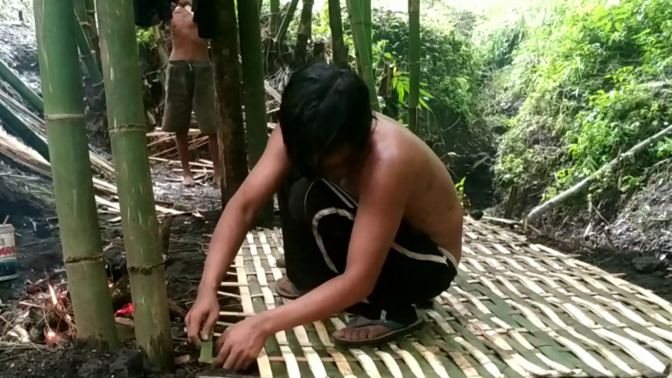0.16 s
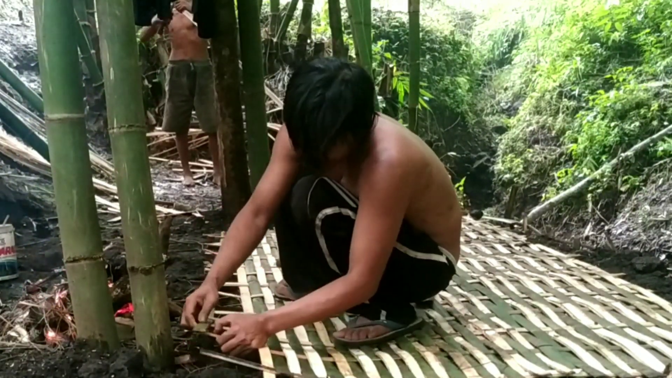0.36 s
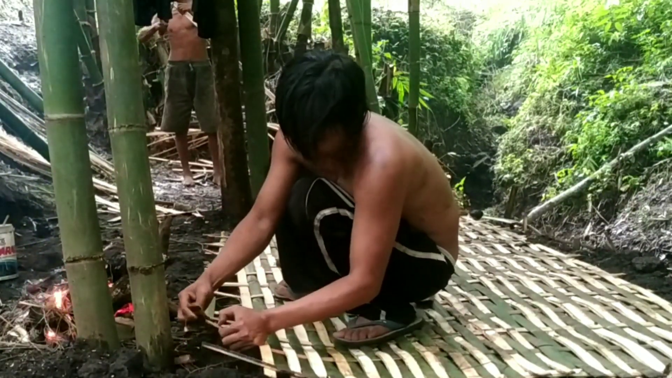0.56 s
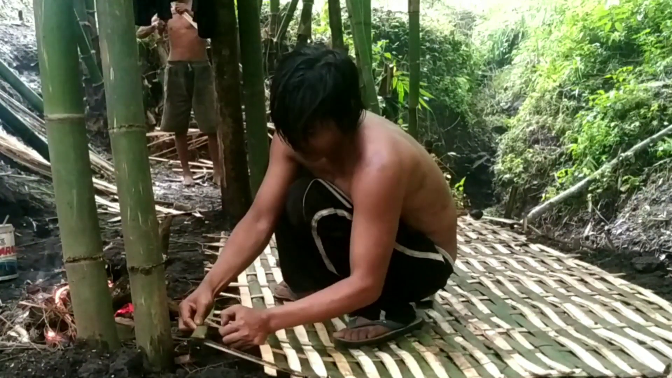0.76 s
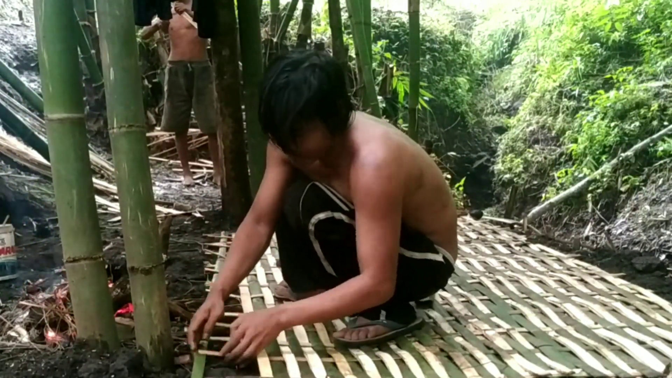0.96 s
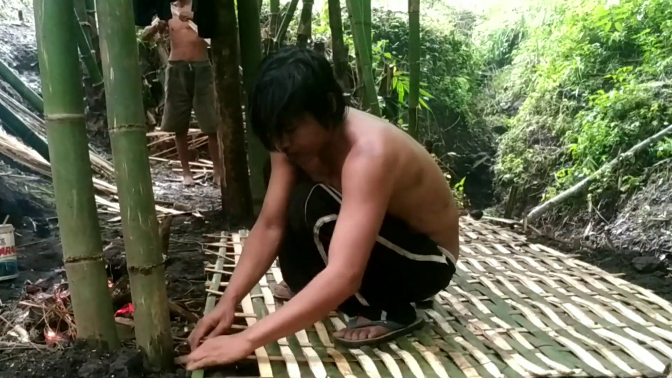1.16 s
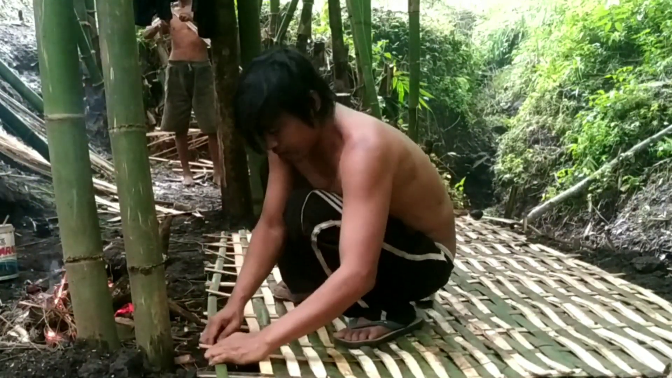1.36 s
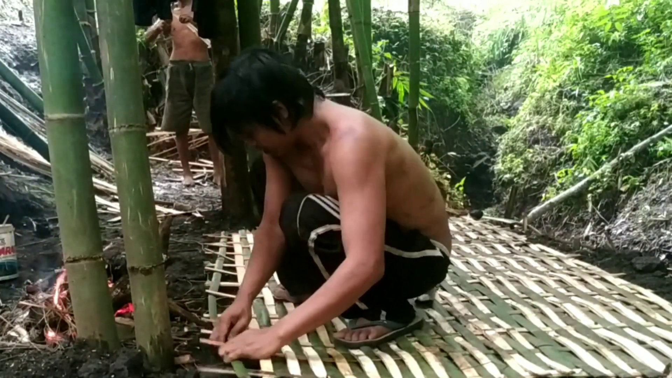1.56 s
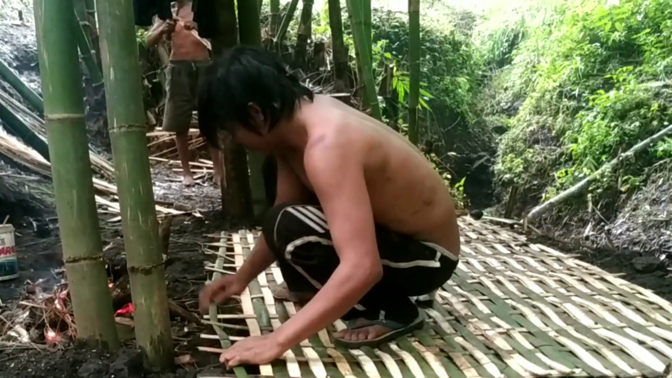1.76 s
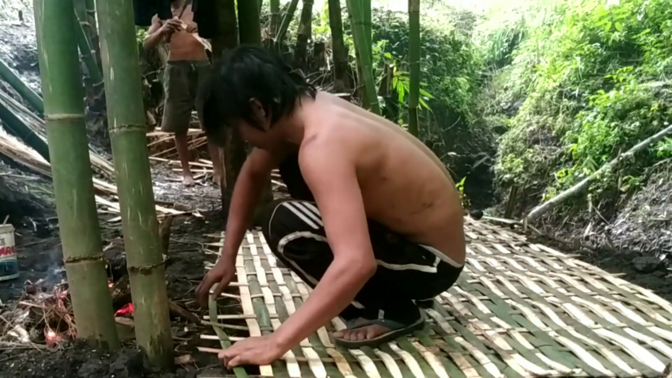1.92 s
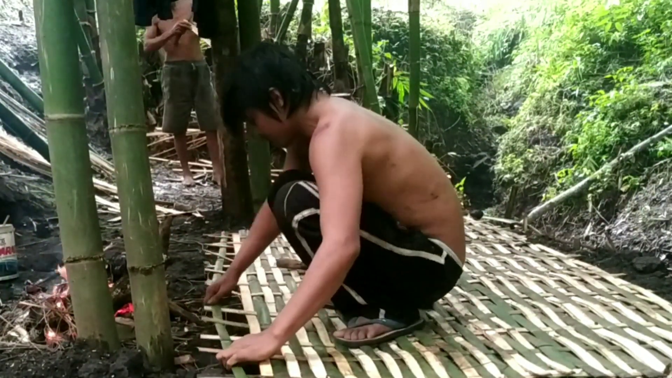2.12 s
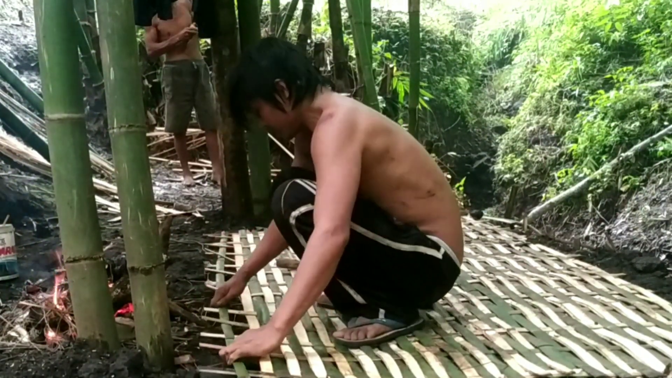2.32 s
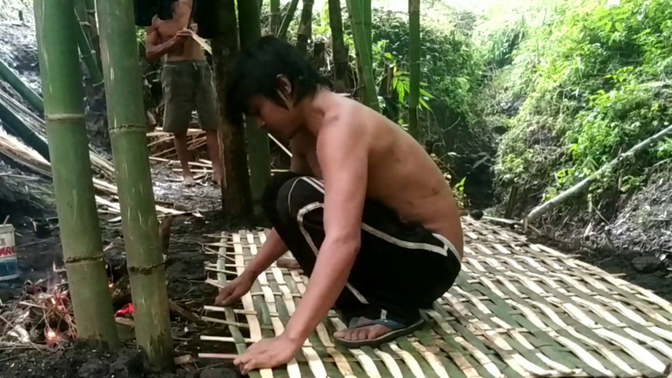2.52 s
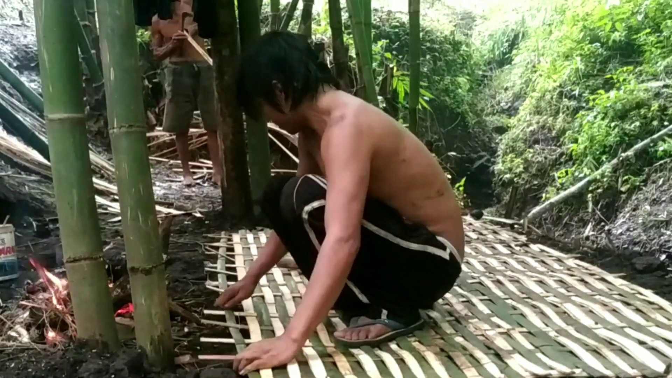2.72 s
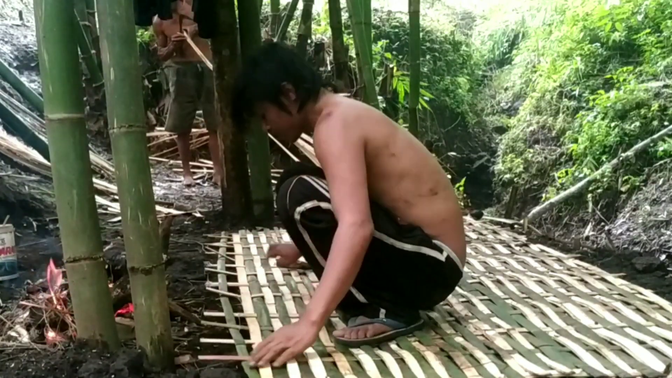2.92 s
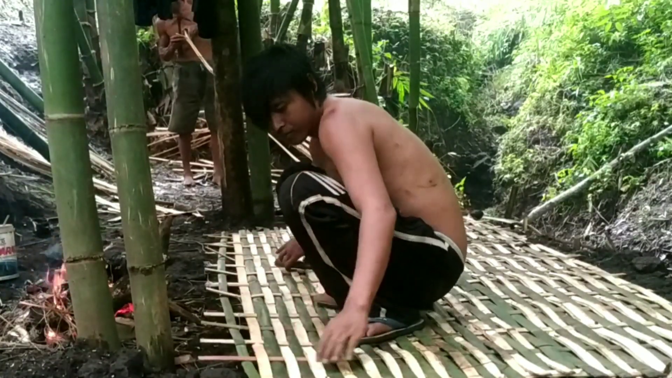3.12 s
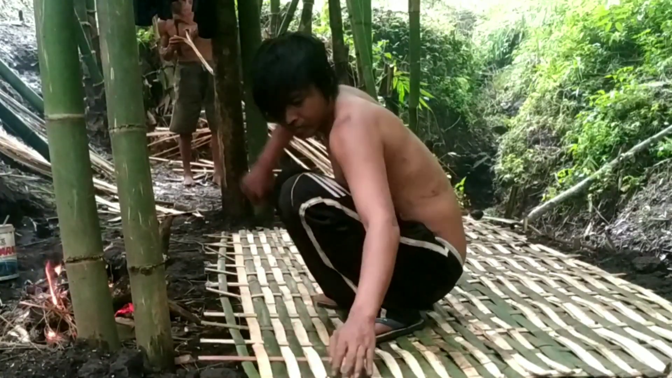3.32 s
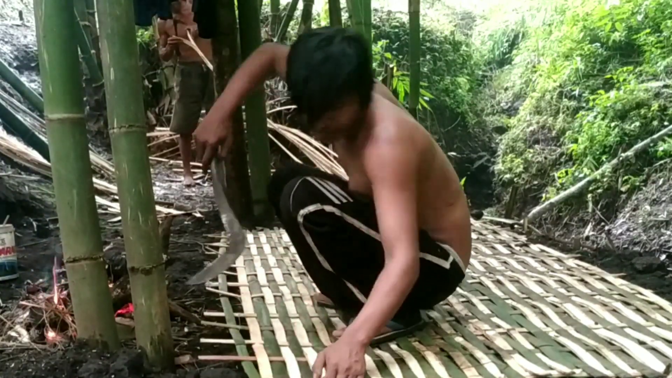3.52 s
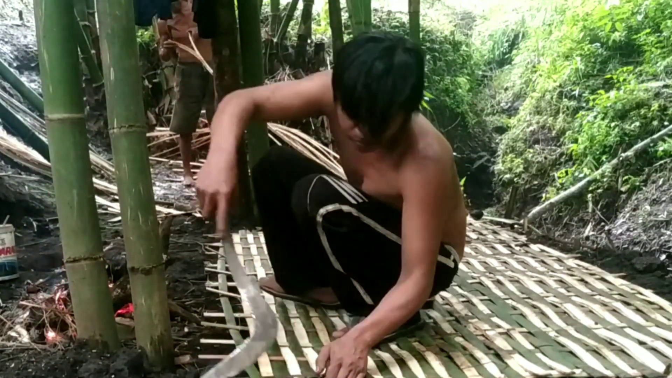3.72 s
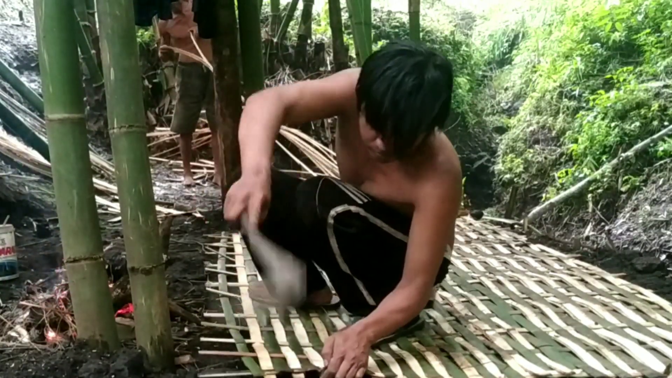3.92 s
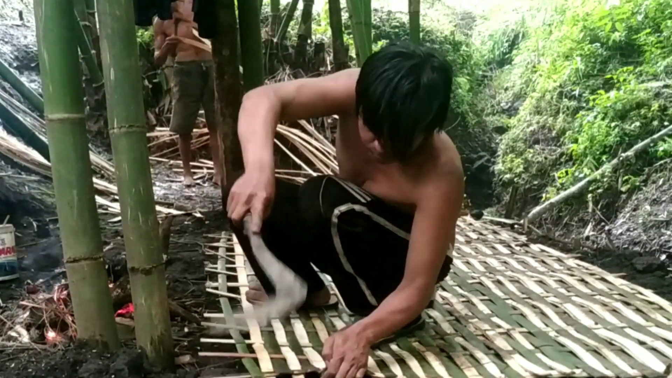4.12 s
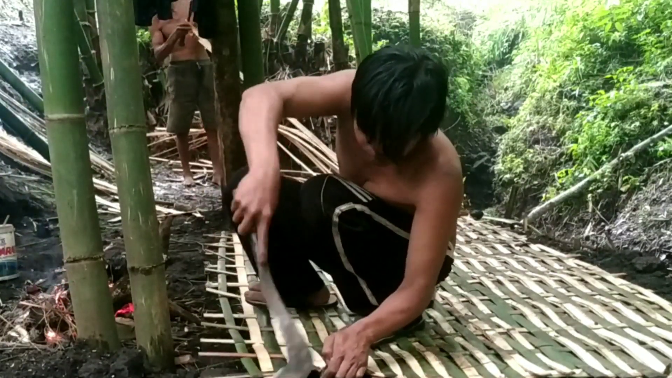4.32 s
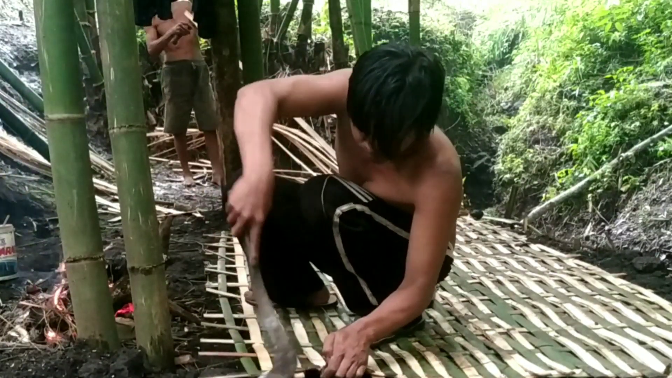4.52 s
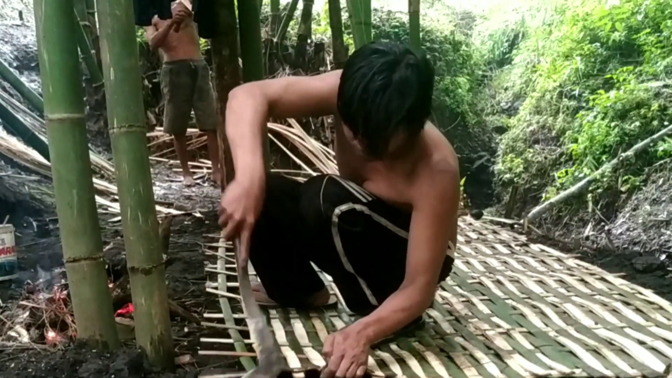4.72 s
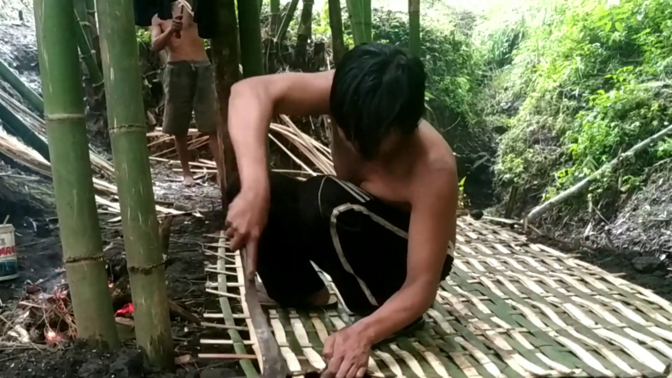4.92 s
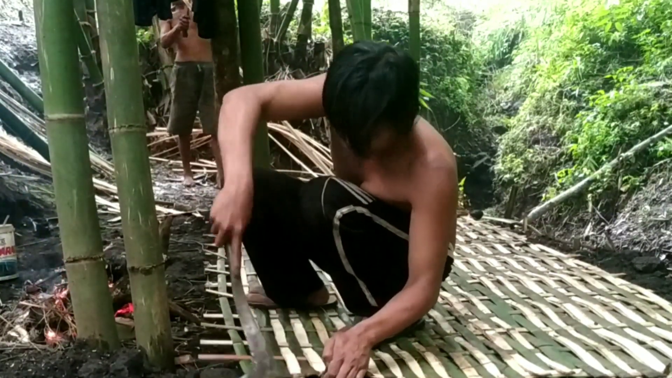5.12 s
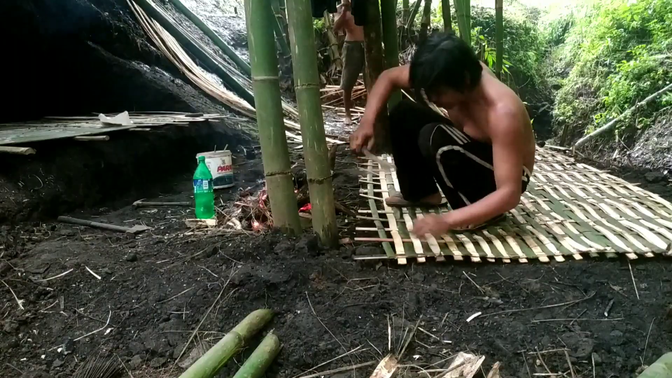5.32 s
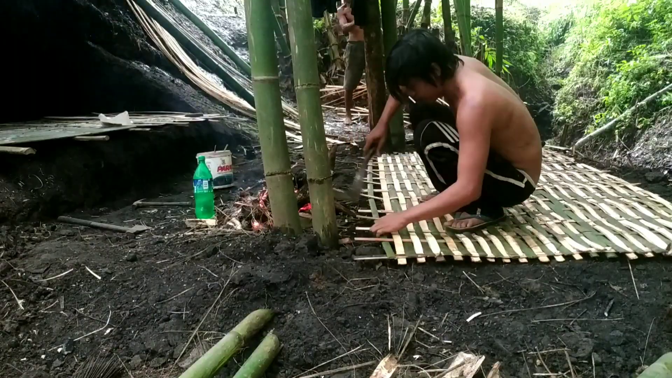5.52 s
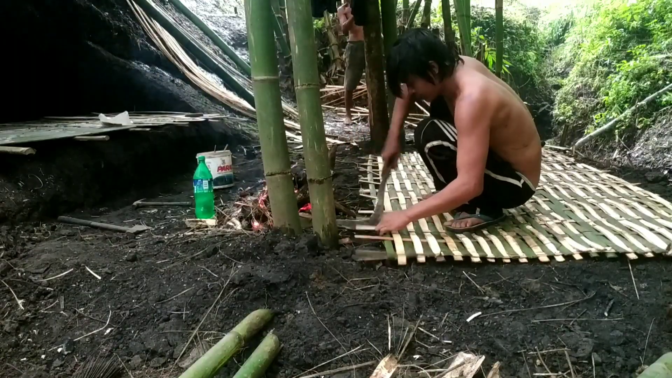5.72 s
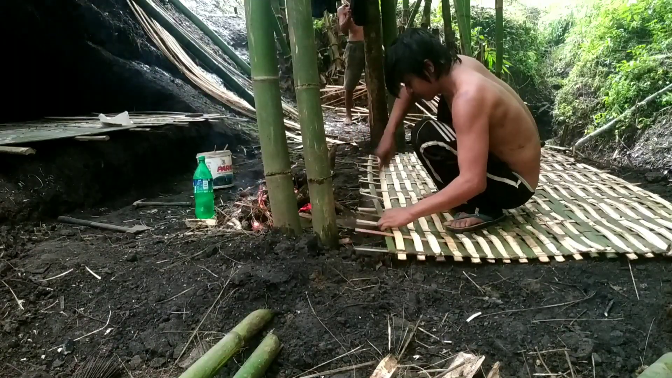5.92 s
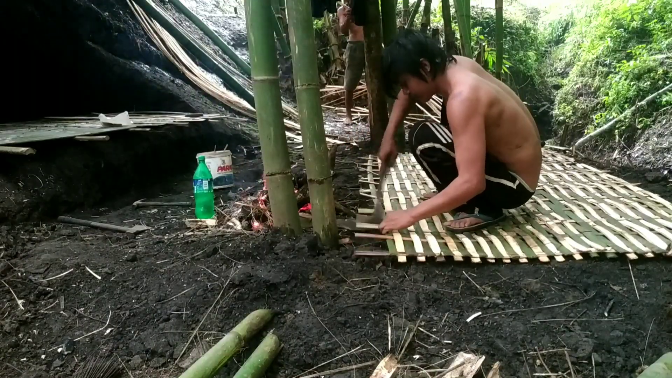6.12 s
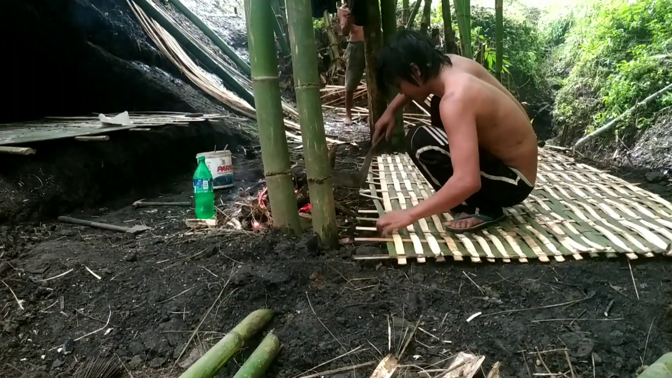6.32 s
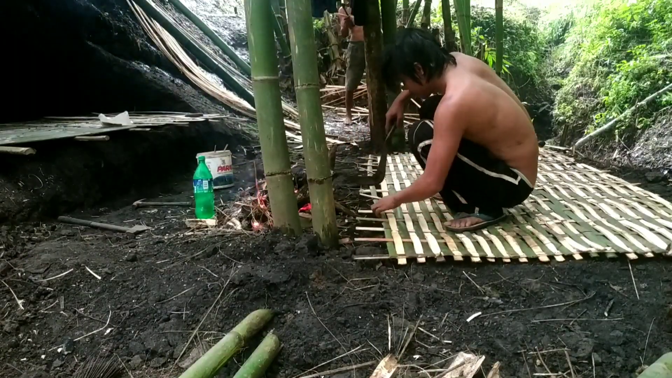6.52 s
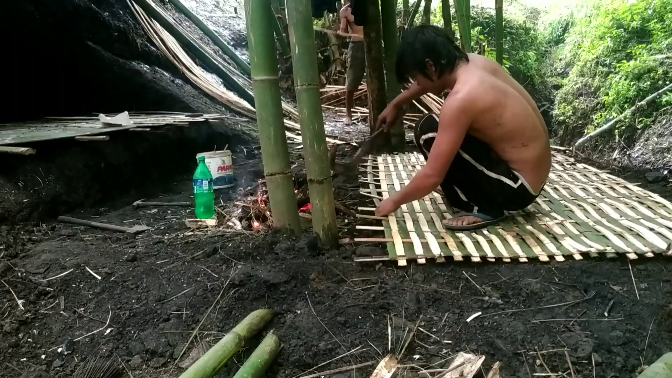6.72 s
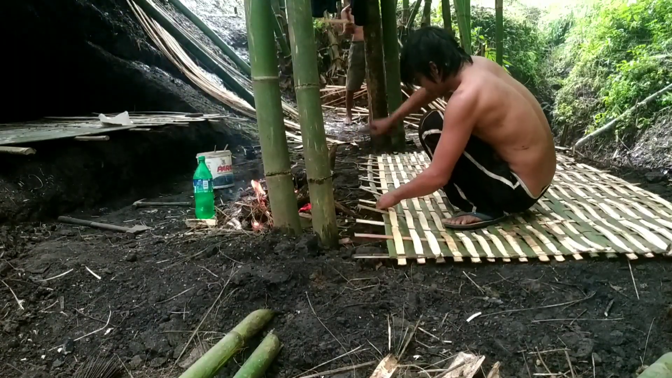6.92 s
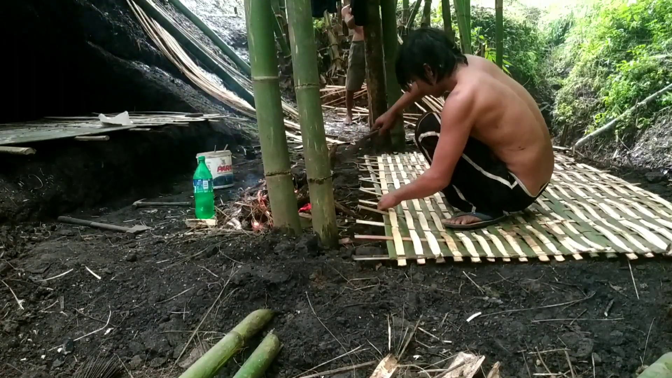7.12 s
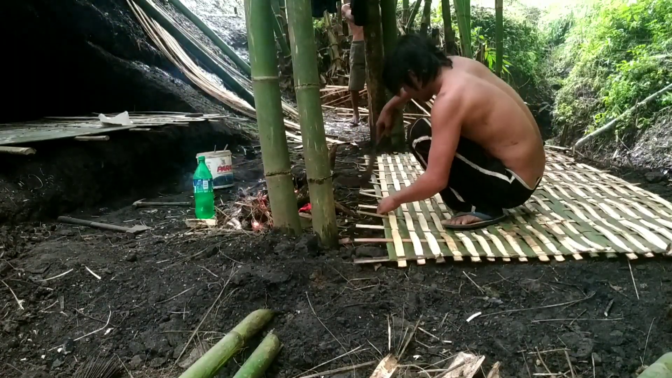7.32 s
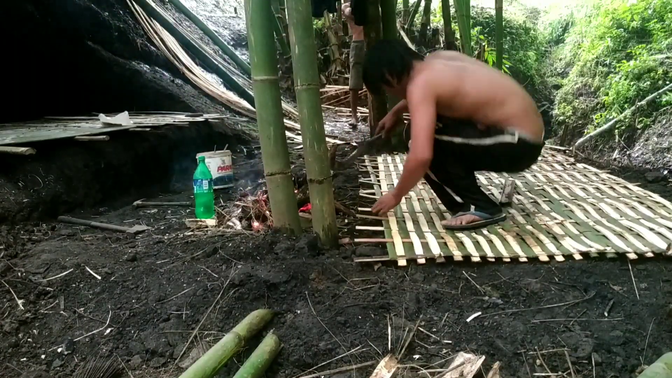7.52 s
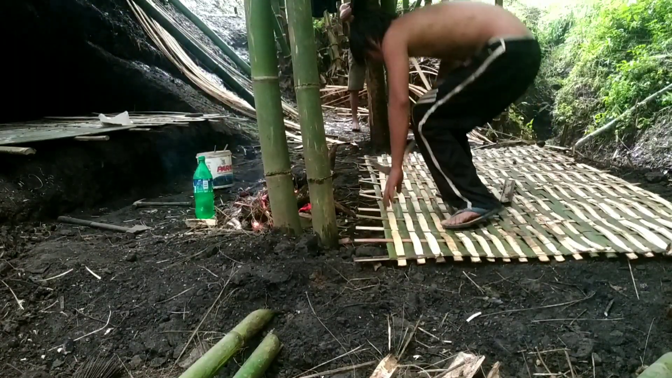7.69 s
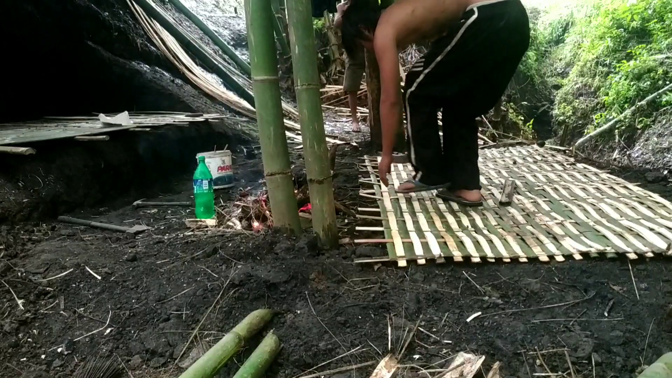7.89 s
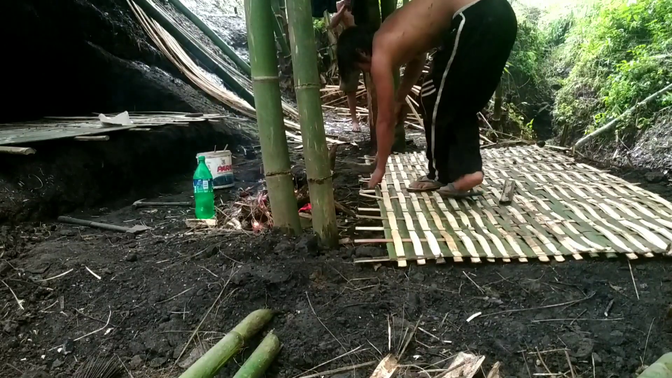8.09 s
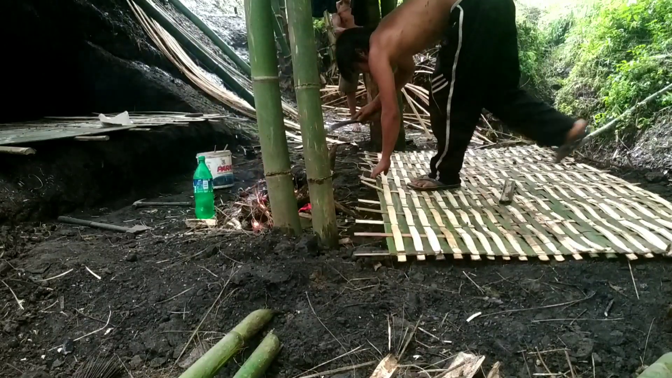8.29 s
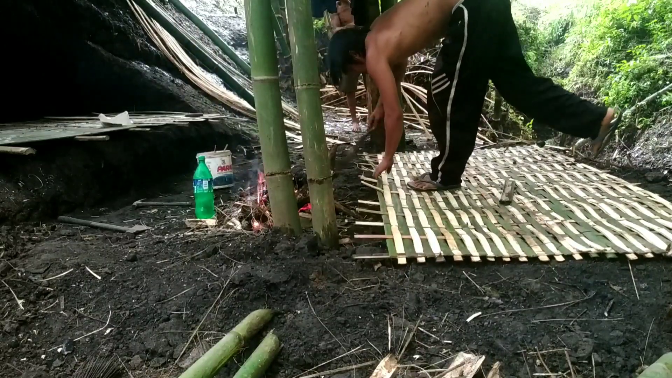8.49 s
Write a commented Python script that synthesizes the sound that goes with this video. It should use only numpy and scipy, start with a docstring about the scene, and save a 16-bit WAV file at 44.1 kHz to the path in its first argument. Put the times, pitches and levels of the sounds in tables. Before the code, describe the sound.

A blade knocks on split bamboo in sharp, rattling blows, with cicadas and crickets droning in the forest around.

```python
"""A weaver drives the strips of a split bamboo panel tight with the back of a blade, crouching on it.
Each blow makes the strips ring, clatter and rattle on; some blows ring the blade too.
Hands and feet scrape over the weave. In the forest around, cicadas and crickets drone and chirp,
louder on the right, over a low murmur of air and embers. Now and then an ember pops."""
import sys
import numpy as np
from scipy import signal
from scipy.fft import rfft, irfft
from scipy.io import wavfile
from scipy.ndimage import uniform_filter1d

SR = 44100
rng = np.random.default_rng(int(sys.argv[2]) if len(sys.argv) > 2 else 0)


def store_pcm(level_fs):
    """Save levels as 16-bit WAV."""
    pcm = np.round(np.clip(level_fs, -1, 1) * 32767).astype(np.int16)
    wavfile.write(sys.argv[1], SR, np.atleast_2d(pcm).T)


N = 377055
BLOW_SIZE, LEAD_S = 2 ** 14, 0.02  # samples in one blow; time before the blade lands
BLOW_T, BLOW_HZ = np.arange(BLOW_SIZE) / SR, np.fft.rfftfreq(BLOW_SIZE, 1 / SR) + 1


def undb(db):
    """Turn decibels into a gain."""
    return 10 ** (np.asarray(db) / 20)


def pan(db):
    """Left and right gains. Pan is left minus right in dB, so below zero is to the right."""
    return undb(np.array([[db / 2], [-db / 2]]))


def fade(t, fade_s):
    """A dying gain. A fade time is how long it takes to drop 60 dB."""
    return 1000 ** (-t / fade_s)


def shape(table, size):
    """Turn (frequency, level) rows into a filter that keeps the overall power of white noise."""
    hz, db = np.transpose(table)
    gain = undb(np.interp(np.log(np.fft.rfftfreq(size, 1 / SR) + 1), np.log(hz), db))
    return gain / np.sqrt(np.mean(gain ** 2))


def through(x, gain):
    """Filter a sound with one gain for each frequency."""
    return irfft(rfft(x) * gain, x.shape[-1])


def causal(gain):
    """The same filter, made to respond only after the sound arrives."""
    cepstrum = irfft(np.log(gain + 1e-6))
    cepstrum[1:len(gain) - 1] *= 2
    cepstrum[len(gain):] = 0
    return np.exp(rfft(cepstrum))


def wobble(rate, size=N):
    """Slide to a new random value, typically within -1 to 1, `rate` times a second."""
    step = int(SR / rate)
    return uniform_filter1d(np.repeat(rng.standard_normal(size // step + 1), step), step)[:size]


def swells(rows):
    """A gain that swells and sinks around each (time, level, rise, fall) row."""
    t, power = np.arange(0, N, 32) / SR, 0
    for s, db, rise, fall in rows:
        power = power + undb(2 * db) * np.exp(-((t - s) / np.where(t < s, rise, fall)) ** 2)
    return np.interp(np.arange(N) / SR, t, np.sqrt(power))


def set_loudest(x, db):
    """Scale a sound so its loudest 4 ms have this level."""
    return x * undb(db) / np.sqrt(uniform_filter1d(np.mean(x ** 2, axis=0), SR // 250).max())


def add(out, part, s):
    """Mix a part in at s seconds."""
    start = int(s * SR)
    out[:, start:start + part.shape[1]] += part[:, :N - start]


def grains(size, spread_db, alike_hz):
    """Noise of many tiny, uneven touches; left and right are alike below alike_hz."""
    sizes = undb(spread_db * np.minimum(rng.exponential(size=size), 6.5))
    mid, side = rng.standard_normal((2, size)) * sizes / np.sqrt(np.mean(sizes ** 2))
    hz = np.fft.rfftfreq(size, 1 / SR)
    apart = hz ** 2 / (hz ** 2 + alike_hz ** 2)
    mid, side = through(mid, np.sqrt(1 - apart / 2)), through(side, np.sqrt(apart / 2))
    return np.array([mid + side, mid - side])


def buzz(hz, width_hz, pulse_hz, depth):
    """An insect's buzz: a narrow band of noise that throbs unsteadily."""
    cycles = np.cumsum(pulse_hz * (1 + 0.16 * wobble(30))) / SR
    throb = 1 + depth * np.sin(2 * np.pi * cycles)
    offset_hz = np.fft.rfftfreq(N, 1 / SR) - hz
    band = through(rng.standard_normal((2, N)) * throb, 1 / (1 + (2 * offset_hz / width_hz) ** 4))
    return band / np.std(band)


# Tone of the forest's murmur: (frequency [Hz], relative level [dB])
AIR_TONE = [(25, -15), (70, -13), (150, -6.5), (190, -2), (370, -7.5), (480, -10), (3200, -16.5),
            (9000, -25.5), (11000, -17.5), (15800, -41)]
def air():
    """Air and embers murmur low, wavering a little."""
    level = undb(-53.5 + 0.2 * wobble(21))
    return level * through(grains(N, spread_db=0.72, alike_hz=493), shape(AIR_TONE, N))


# Far insect voices: (pitch [Hz], band width [Hz], level [dB], pulse rate [Hz], pan [dB])
CHORUS_VOICES = [(5020, 210, -63, 150, -13), (5450, 540, -56, 260, -1.5), (6574, 890, -55.5, 230, -9),
                 (7210, 690, -56, 72, -3), (8220, 780, -54, 340, -5)]
def far_chorus():
    """Distant insects blend into a few unbroken buzzes."""
    out = np.zeros((2, N))
    for hz, width_hz, db, pulse_hz, pan_db in CHORUS_VOICES:
        level = undb(db + 1.1 * wobble(1.56) + 2.1 * wobble(21))
        out += level * pan(pan_db) * buzz(hz, width_hz, pulse_hz, depth=0.091)
    return out


# How loud the rasping insect is: (time [s], level [dB])
RASP_LEVELS = [(0.0, -64), (0.83, -60.5), (1.19, -52.5), (1.4, -52.5), (1.71, -61), (2.4, -60.5),
               (3.5, -65), (5.0, -68), (6.02, -61), (7.02, -59), (7.22, -55), (7.72, -63), (8.25, -53),
               (8.55, -65)]
def rasping_insect():
    """One insect rasps in fits, pitched below the chorus."""
    times, db = np.transpose(RASP_LEVELS)
    level = undb(np.interp(np.arange(N) / SR, times, db) + 3.5 * wobble(16))
    return level * pan(-4) * buzz(4700, width_hz=590, pulse_hz=60, depth=0.25)


# Cricket chirps: (time [s], level [dB], pitch [Hz], pan [dB])
CRICKET_CHIRPS = [(0.196, -46, 5800, -5.5), (0.264, -46, 5660, -19), (0.66, -49, 5900, -1),
                  (0.95, -44.5, 5640, -13), (1.156, -53, 5970, -2.5), (1.8173, -50, 5430, -15),
                  (2.128, -47, 5830, -6.0), (2.488, -44, 5600, -11), (2.642, -45, 5930, -8),
                  (3.132, -46, 5960, -2.5), (6.625, -47, 5800, -15), (7.465, -45, 5620, -8),
                  (7.808, -47, 5890, -4.0)]
def crickets(chirp_s=0.027):
    """Short notes glide down; leaves scatter them, so each side flutters differently."""
    out, t = np.zeros((2, N)), np.arange(int(chirp_s * SR)) / SR
    for s, db, hz, pan_db in CRICKET_CHIRPS:
        cycles = np.cumsum(hz * (1.03 - 0.061 * t / chirp_s)) / SR
        chirp = np.sin(np.pi * t / chirp_s) * np.sin(2 * np.pi * cycles)
        flutter = np.array([1 + 0.8 * wobble(350, len(t)) for _ in range(2)])
        add(out, undb(db) * pan(pan_db) * flutter * chirp, s)
    return out


# The near cicada's calls: (loudest moment [s], level [dB])
CICADA_CALLS = [(.53, -51), (1.92, -50), (3.52, -51), (5.66, -51.5), (7.2, -52), (8.5, -56)]
def cicada(rise_s=0.13, fall_s=0.16):
    """A nearby cicada buzzes in swelling calls and drones on, a little lower, between them."""
    waver = undb(1.5 * wobble(25))
    calls = swells([(s, db, rise_s, fall_s) for s, db in CICADA_CALLS])
    song = calls * buzz(3740, width_hz=470, pulse_hz=128, depth=0.25)
    drone = undb(-62 + 2.5 * wobble(2.3)) * buzz(3557, width_hz=280, pulse_hz=128, depth=0.26)
    return waver * pan(-4) * (song + drone)


# Pops from a nearby fire: (time [s], level [dB], pitch [Hz], pan [dB], fade time [s])
EMBER_POPS = [(2.176, -22.5, 6450, -8, 0.0035), (2.3233, -34, 6940, -7, 0.013),
              (3.56, -37, 8100, -7, 0.014), (6.552, -32, 5370, 2, 0.015), (7.429, -27.5, 4820, -6, 0.028),
              (7.944, -38, 6450, -3.5, 0.013)]
def ember_pops():
    """Embers give short, sharp pops that ring very briefly, with a click on top."""
    out, t = np.zeros((2, N)), np.arange(SR // 20) / SR
    for s, db, hz, pan_db, fade_s in EMBER_POPS:
        click = 0.4 * rng.standard_normal((2, len(t))) * np.exp(-t / 0.0028)
        ring = np.sin(2 * np.pi * hz * t) * fade(t, fade_s)
        add(out, undb(db) * pan(pan_db) * (ring + click), s)
    return out


# Tone of rubbed bamboo: (frequency [Hz], relative level [dB])
SCRAPE_TONE = [(100, -34), (250, 1), (600, 0.5), (1500, -0.5), (3000, 3.5), (5600, 7.5), (9000, 5),
               (15700, 3.5)]
# Scrapes over the weave, and one low swell of rattling after a blow (at 4.565 s):
# (loudest moment [s], level [dB], rise time [s], extra lows [dB])
WEAVE_SWELLS = [(.95, -56, .028, -8), (1.25, -51.5, 0.034, 2), (1.37, -47, 0.03, -2), (1.52, -50, 0.017, 5),
                (1.63, -50, 0.029, 4), (2.2, -45, 0.017, -3), (2.319, -40, 0.014, 0),
                (2.451, -38, 0.013, -2), (3.15, -52, 0.075, 4.5), (3.29, -41, 0.027, 2.5),
                (3.39, -39, 0.036, 0.5), (3.66, -43, 0.046, 2.5), (3.76, -45.5, 0.051, 3),
                (3.97, -48, 0.035, -8), (4.565, -58, 0.082, 16), (5.444, -27.5, 0.018, -7.5),
                (6.36, -47.5, 0.065, -7), (6.759, -42, 0.037, -1), (7.77, -58, 0.14, 11),
                (7.96, -49, 0.02, 11), (8.03, -43.5, 0.019, 4), (8.17, -46, 0.032, 4.5),
                (8.229, -26.5, 0.018, -11.5)]
def scrapes(fall_per_rise=1.14):
    """Hands, feet and blade scrape the strips, deeper when heavy; once, a low rattle follows a blow."""
    catching = undb(2.2 * wobble(150))
    rub = through(grains(N, spread_db=2.45, alike_hz=1600), shape(SCRAPE_TONE, N)) * catching
    lows = signal.sosfilt(signal.butter(2, 4000, fs=SR, output="sos"), rub)
    highs = rub - lows
    high_gain = swells([(s, db, rise, fall_per_rise * rise) for s, db, rise, _ in WEAVE_SWELLS])
    low_gain = swells([(s, db + extra, rise, fall_per_rise * rise)
                       for s, db, rise, extra in WEAVE_SWELLS])
    fidget = undb(-56 + 2.6 * wobble(23)) * highs  # the crouching body never stops rustling
    return pan(-3) * (high_gain * highs + low_gain * lows) + fidget


# The steel's own notes: (pitch [Hz], relative level [dB], fade time [s])
BLADE_NOTES = [(2260, 4, 0.12), (2380, -4.5, 0.1), (2990, -8, 0.16)]
# Blows that leave the blade ringing: (time [s], level [dB])
BLADE_RINGS = [(4.012, -46), (4.266, -26.5), (4.517, -60), (4.749, -40), (4.984, -36), (5.188, -46),
               (7.012, -37)]
def blade():
    """The steel rings with a few close notes, cut short and roughened by the grip."""
    out, t = np.zeros((2, N)), np.arange(SR // 3) / SR
    for s, db in BLADE_RINGS:
        ring = 0
        for hz, note_db, fade_s in BLADE_NOTES:
            level = undb(note_db + 3.5 * wobble(69, len(t))) * fade(t, fade_s)
            ring += level * np.sin(2 * np.pi * (hz * t + rng.random()))
        add(out, undb(db) * pan(-1.5) * ring, s)
    return out


PANEL_LOW_HZ = 200  # the panel lies on soil and gives off little sound below this
# Tone of the loose strips: (frequency [Hz], relative level [dB])
RATTLE_TONE = [(35, -54), (60, 4), (211, -14), (1430, -13), (2320, -7.5), (3300, -10.5), (3970, -10.5),
               (6330, -9), (14000, -18.5), (15700, -21.5)]
def rattle(strip_hz, treble_db, fade_s=0.39):
    """Loose strips rattle in fits as the shock spreads; a bright blow leaves a bright rattle."""
    after = np.maximum(BLOW_T - LEAD_S, 0)
    level = (1 - np.exp(-after / 0.00067)) * fade(after, fade_s)
    touches = grains(BLOW_SIZE, spread_db=1.5, alike_hz=800)
    fits = undb(2.4 * wobble(149.7, BLOW_SIZE))
    tone = shape(RATTLE_TONE, BLOW_SIZE) / (1 + (PANEL_LOW_HZ / BLOW_HZ) ** 2)
    struck_strip = 1 + 0.23 / (1 + ((BLOW_HZ - strip_hz) / 150) ** 2)
    brightness = undb((0.93 * treble_db - 0.5) * (1 - below(5500)))
    return through(touches * fits * level, tone * struck_strip * brightness)


def below(edge_hz):
    """A filter that keeps the part of a blow below this frequency."""
    return 1 / (1 + (BLOW_HZ / edge_hz) ** 4)


def clatter(rise_ms, fade_s):
    """The force of a blow: a burst of strips hitting strips."""
    rising = np.exp(np.minimum(BLOW_T - LEAD_S, 0) / (rise_ms / 1000))
    falling = fade(np.maximum(BLOW_T - LEAD_S, 0), fade_s)
    force = grains(BLOW_SIZE, spread_db=1.5, alike_hz=4200) * rising * falling
    force[:, int(LEAD_S * SR)] += undb(13.5) / rise_ms  # first touch, sharper for a quick blow
    return force


# The panel's own notes: (pitch [Hz], relative level [dB], fade time [s])
PANEL_NOTES = [(211, 6, 0.039), (313, 11.5, 0.021), (422.5, 6, 0.035), (612, 0, 0.025), (800, -11.5, 0.047),
               (989, -10.5, 0.042), (1220, -5.5, 0.048), (1510, 8, 0.0053), (1790, 5.5, 0.013),
               (2245, 5.5, 0.018), (2510, -13, 0.0074), (2926, 1, 0.09), (4140, -4, 0.028),
               (4730, -22, 0.0093), (5200, 8, 0.012), (6360, -5, 0.025), (6670, -9, 0.032)]
# Tone of the blade meeting bamboo: (frequency [Hz], relative level [dB])
CONTACT_TONE = [(35, -39), (60, -11), (412, 9.5), (2040, -26), (2290, 8), (3260, 9.5), (5100, 11),
                (13700, -16), (15400, -8), (16500, -59)]
def panel_filter(hollow_hz, strip_hz):
    """How the panel answers a blow. Each lands somewhere new, so the notes shift in pitch and level."""
    notes = [(hz * (1 + 0.033 * rng.normal()), db + 3 * rng.normal(), fade_s)
             for hz, db, fade_s in PANEL_NOTES]
    notes += [(hollow_hz, 2.5, 0.058), (strip_hz, 4.5, 0.026)]  # the hollow below; the struck strip
    ring = rfft(sum(undb(db) * np.sin(2 * np.pi * hz * BLOW_T) * fade(BLOW_T, fade_s)
                    for hz, db, fade_s in notes))
    contact = undb(0.5) * causal(shape(CONTACT_TONE, BLOW_SIZE))
    return ring / np.sqrt(np.mean(np.abs(ring) ** 2)) + contact


# Blows and taps; rattle, body and treble are relative to the crack:
# (time [s], hollow pitch [Hz], rattle [dB], crack level [dB], body [dB], treble [dB],
#  strip pitch [Hz], rise time [ms], clatter fade time [s])
BLADE_BLOWS = [(0.078, 700, -12, -47.5, -5, 2, 806, 1.3, 0.052),
               (0.403, 190, -9, -51, -8, -5, 1010, 1.3, 0.086),
               (1.715, 192, -10, -47.5, -8, 4, 1780, 1.1, 0.065),
               (2.007, 470, -7, -49.5, 1.5, -2, 766, 1.4, 0.11),
               (2.149, 270, -7, -50, -2, 6, 770, 1.3, 0.037),
               (2.176, 196, -5, -46, -13, 20, 3130, 1.4, 0.025),
               (2.462, 450, -12, -37, -11, 2, 880, 0.65, 0.06),
               (2.585, 207, 1, -54, 8, 10.5, 800, 1.8, 0.093),
               (3.334, 630, -12, -43.5, -4, -6, 920, 1.1, 0.25),
               (3.56, 277, -11, -44, -6, 0.0, 1070, 1.7, 0.085),
               (4.011, 464, -9, -15.5, -2, -4.5, 2200, 0.59, 0.088),
               (4.265, 630, -7.5, -13, -9, -6.5, 2210, 0.7, 0.05),
               (4.516, 390, -7.5, -12, -8, -9, 1580, 0.58, 0.024),
               (4.747, 613, -11, -14.5, -4.5, -3, 2170, 0.58, 0.059),
               (4.983, 450, -7, -11.5, -7.5, -8, 1560, 1.3, 0.041),
               (5.187, 477, -8, -20, 0, -4, 982, 5, 0.05), (5.254, 536, -3, -42.5, -17, 5, 2340, 1.3, 0.05),
               (5.433, 655, -8, -22, -36, 3, 1810, 2.5, 0.047),
               (5.799, 230, -10.5, -21, -11.5, -1, 1620, 4.9, 0.081),
               (6.014, 293, -13.5, -16.5, -12, -3.5, 1177, 2.5, 0.08),
               (6.173, 474, -8, -20, -10, -1, 1780, 0.84, 0.075),
               (6.241, 410, -12, -42.5, -1.5, 2, 1320, 1.3, 0.087),
               (6.345, 471, -4, -43, -29, -4, 3114, 1.1, 0.072),
               (6.503, 250, -14, -42.5, -26, -3, 786, 1.1, 0.049),
               (7.011, 460, -8.5, -15, -19, -2.5, 2350, 0.82, 0.11),
               (7.284, 210, -4.5, -27.5, -4, -2.5, 1950, 4.5, 0.11),
               (7.429, 636, -12, -39.5, -15, 3, 720, 1.7, 0.16),
               (7.867, 387, -5, -40, -22, -11, 2100, 3.4, 0.091),
               (7.942, 334, -12, -46, -2, -2, 2860, 1.1, 0.057),
               (8.049, 231, -2, -33.5, -17, -1.5, 1160, 1.7, 0.047),
               (8.221, 495, -6, -23.5, -24.5, 3.5, 1930, 3.9, 0.058),
               (8.451, 318, -9.5, -17.5, -13.5, 1, 900, 2.5, 0.096)]
def blows():
    """The back of the blade hits the weave: clatter rings the panel, then loose strips rattle on."""
    body = below(700) / (1 + (PANEL_LOW_HZ / BLOW_HZ) ** 4)
    middle, crack, treble = below(2200) - below(700), below(5500) - below(2200), 1 - below(5500)
    bands = [causal(band) for band in (body, middle, crack, treble)]
    pan_db = 0.5 - 4 / (1 + (np.log(BLOW_HZ / 5100) / 0.76) ** 2)  # the highs lean to the right
    sides = [causal(undb(pan_db / 2)), causal(undb(-pan_db / 2))]
    out = np.zeros((2, N))
    for s, hollow_hz, rattle_db, db, body_db, treble_db, strip_hz, rise_ms, fade_s in BLADE_BLOWS:
        panel = panel_filter(hollow_hz, strip_hz)
        force = clatter(rise_ms, fade_s)
        middle_db = 0.5 + 0.36 * body_db  # the middle partly follows the body
        knock = sum(set_loudest(through(force, panel * band), db + band_db)
                    for band, band_db in zip(bands, (body_db, middle_db, 0, treble_db)))
        sound = knock + undb(db + rattle_db) * rattle(strip_hz, treble_db)
        sound[1] = np.roll(sound[1], 2)  # reaches the right side a little later
        add(out, through(sound, sides), s - LEAD_S)
    return out


def scene():
    """The weaver at work by a fire, with the forest all around."""
    nearby = blows() + blade() + ember_pops() + scrapes()
    return nearby + cicada() + rasping_insect() + far_chorus() + crickets() + air()


def record(dry):
    """The microphone drops the deep bass and the highest treble; the recorder cuts what is left above."""
    mic = signal.sosfilt(signal.butter(2, 125, "high", fs=SR, output="sos"), dry)
    mic = signal.sosfilt(signal.ellip(6, 0.3, 25, 15800, fs=SR, output="sos"), mic)
    return signal.sosfilt(signal.ellip(10, 0.2, 80, 16800, fs=SR, output="sos"), mic)


dry = scene()
out = record(dry)
store_pcm(out)
```